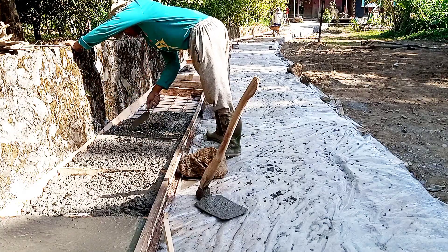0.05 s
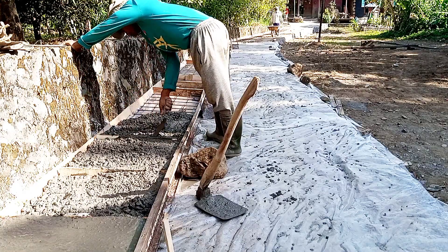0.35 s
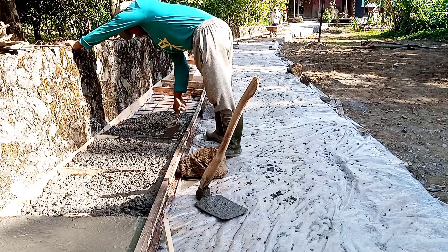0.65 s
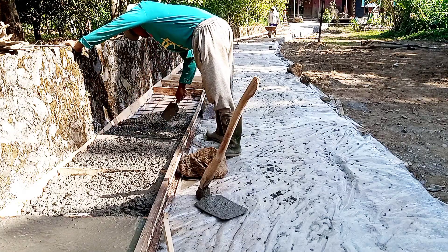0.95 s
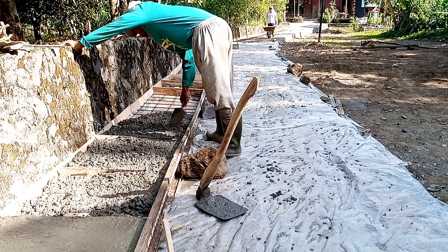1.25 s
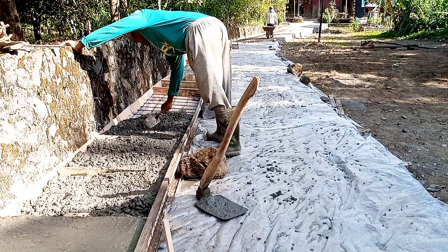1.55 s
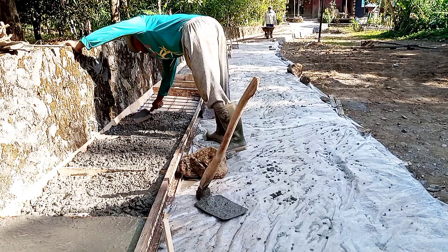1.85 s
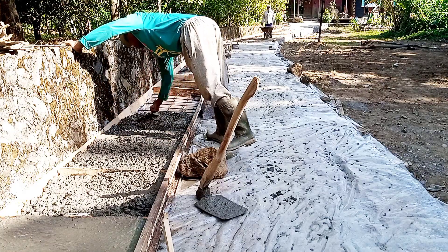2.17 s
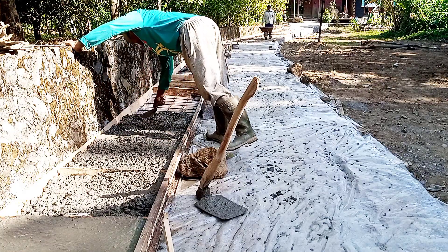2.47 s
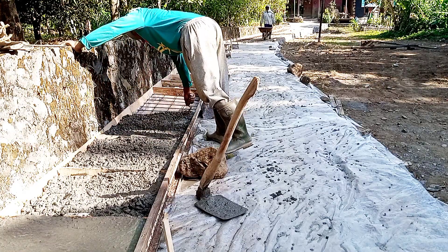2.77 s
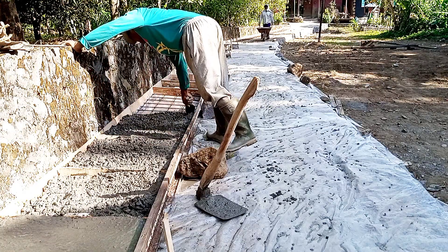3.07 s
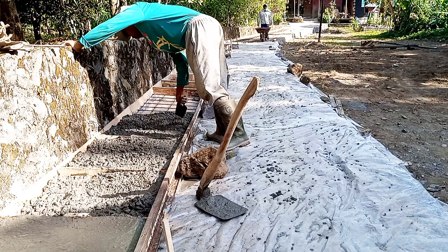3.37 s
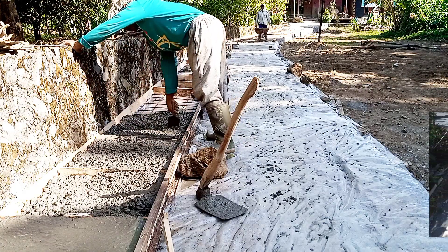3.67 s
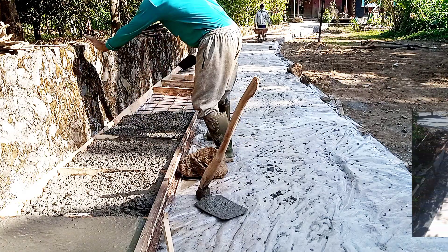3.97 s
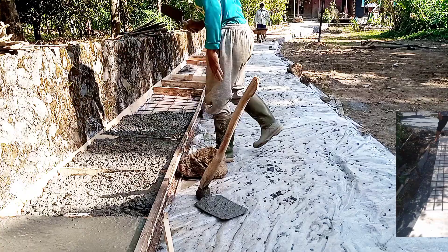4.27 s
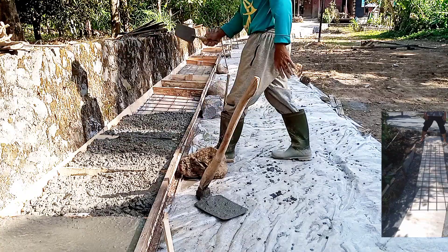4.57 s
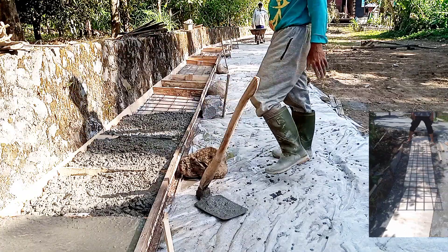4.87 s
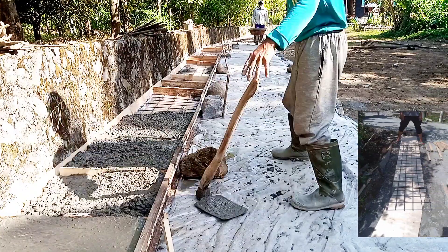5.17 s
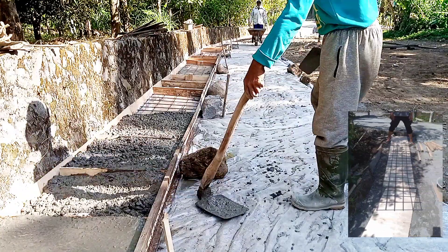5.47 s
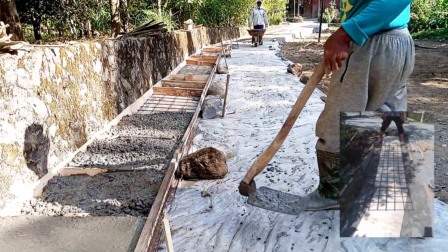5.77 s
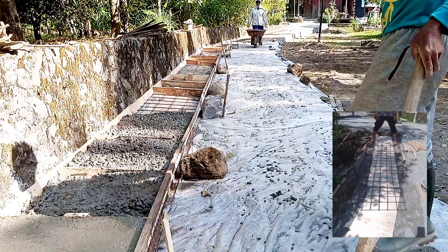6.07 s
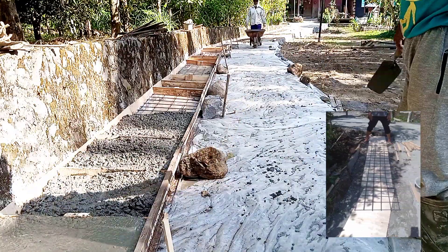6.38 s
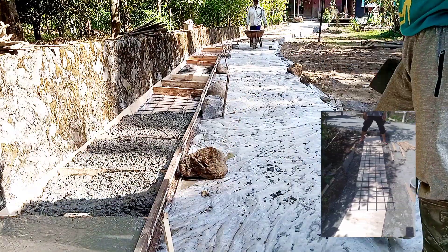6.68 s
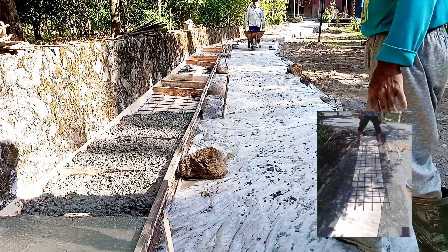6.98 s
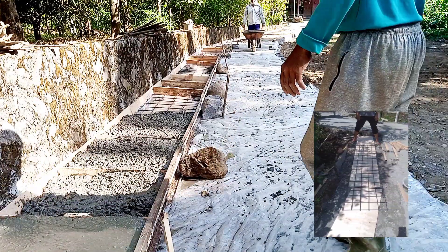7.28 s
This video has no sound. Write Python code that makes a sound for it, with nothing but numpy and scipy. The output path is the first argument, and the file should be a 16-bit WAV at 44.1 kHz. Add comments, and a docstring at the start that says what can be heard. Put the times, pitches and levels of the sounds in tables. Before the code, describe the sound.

Gritty trowel strokes and sharp clinks in wet concrete, followed by soft footsteps on plastic, with a light breeze rumbling.

```python
"""A worker spreads wet, stony concrete with a steel trowel, outdoors beside a wall.
0-3.8 s: the blade drags through the mix, crushing grit and pushing mortar; it knocks on stones,
hardest at 2.3 and 3.1 s, and air pockets plop. Near 3.5 s the light breeze that rumbles on the
microphone throughout gusts most. From 3.9 s his clothes rustle as he stands up; from 4.2 s he
walks off in rubber boots over crackling plastic sheeting, against a faint far hiss."""
import sys
import numpy as np
from scipy import signal
from scipy.fft import rfft, irfft
from scipy.io import wavfile

SR = 44100
rng = np.random.default_rng(int(sys.argv[2]) if len(sys.argv) > 2 else 0)


def generate_wav(signal):
    """Clip the signal to [-1, 1] and save it as 16-bit WAV at the path in sys.argv[1]."""
    frames = np.transpose(np.atleast_2d(signal))
    scaled = np.clip(frames, -1, 1) * 32767
    pcm = np.round(scaled).astype(np.int16)
    wavfile.write(sys.argv[1], SR, pcm)


N = 332073
TIME = np.arange(N) / SR

# blade hits stone: (time [s], level [dB], t60 [s], body re edge [dB], fizz re edge [dB], favoured [Hz])
KNOCKS = [(0.049, -46.5, 0.062, -25, -23, 4500), (0.233, -32.5, 0.054, -17, -19, 3000),
          (0.559, -35, 0.085, -9, -16, 3600), (0.811, -27.5, 0.027, -3, -37, 3500),
          (0.951, -34, 0.039, -5, -35, 4000), (0.975, -31, 0.037, -7, -45, 3600),
          (1.13, -23, .065, -8.5, -18, 4370), (1.329, -44.5, 0.017, -14, -25, 4600),
          (1.468, -45, 0.054, -4, -8.5, 2500), (1.529, -26, 0.007, 0, -40, 2660),
          (2.232, -26.5, 0.054, -28, -15.5, 4070), (2.281, -11.5, 0.043, -18.5, -32, 2830),
          (2.298, -21.5, 0.054, -20.5, -23, 3500), (2.334, -14.5, 0.061, -39, -46, 2800),
          (2.574, -22.5, 0.12, -9, -23, 3470), (3.109, -5, 0.061, -1.5, -51, 3530),
          (3.127, -13.5, 0.045, -4.5, -27, 4400), (3.149, -20, 0.031, 4.5, -37, 2700),
          (3.46, -25, 0.078, -8.5, -19, 4100), (3.506, -17.5, 0.0052, -31, -32, 4150)]
KNOCK_RISE_PER_T60 = .11
# spectra of blade edge, blade body and soft mortar: (frequency [Hz], level [dB])
EDGE_SPECTRUM = [(700, -38), (1300, -15), (1800, -5.5), (2500, 3.5), (4000, 3), (4700, 3), (5300, -3.5),
                 (6800, -12.5), (7800, -31), (9500, -34.5), (12500, -30.5), (15500, -34)]
BODY_SPECTRUM = [(300, -23), (500, -14), (700, -3), (1050, 1.5), (1400, 1), (2000, -13), (3500, -50),
                 (8000, -60)]
MORTAR_SPECTRUM = [(100, -22.5), (200, -1), (290, 4.5), (480, -1), (700, -13.5), (1500, -36.5),
                   (5000, -57.5)]


def scraping(edge_db=1.0, body_db=-2.5, mortar_db=-3.5, stones_db=-12):
    """Grit slips under the blade, wet pockets burst, pebbles tick, mortar is pushed ahead."""
    grit = grains(per_s=8000, spread_db=3.4, clump_db=2.3, clump_per_s=260)
    wet = .4 * pockets(per_s=330, life_s=.03, spread_db=10, low_hz=600, high_hz=4800)
    squelch = pockets(per_s=90, life_s=.06, spread_db=6, low_hz=180, high_hz=620)
    squelch += grains(per_s=1100, spread_db=0.5, clump_db=4.0, clump_per_s=60)
    stones = from_db(stones_db) * grains(per_s=46, spread_db=2.0, clump_db=1.0, clump_per_s=12)
    steel = blade(grit + wet + stones, ring_db=-3, swing_db=5)
    on_edge, on_body, on_mortar, on_fizz = pressure()
    edge = from_db(edge_db) * on_edge * unit_rms(colour(cavities(steel), EDGE_SPECTRUM))
    body = from_db(body_db) * on_body * unit_rms(colour(steel, BODY_SPECTRUM))
    mortar = from_db(mortar_db) * on_mortar * unit_rms(colour(squelch, MORTAR_SPECTRUM))
    return edge + body + mortar + treble_fizz(on_fizz, gain_db=0.5) + furrow()


def pressure(judder_db=0.11, judder_per_s=70):
    """Gains of edge, body, mortar and fizz under uneven drag; pushes add in power."""
    # pushes: (time [s], length [s], edge [dB], fade [dB], body [dB], mortar [dB], fizz [dB])
    # last three re edge
    strokes = [(0.0, 0.074, -62.5, 7.5, 0, -3, -37), (0.309, .14, -54.5, 5, -2.5, -16.5, -17.5),
               (0.597, 0.13, -49.5, 7, -3.5, -20, -25), (0.737, 0.053, -65, -11.5, -2, -25, -24),
               (0.782, 0.075, -45.5, 2, 0, -26, -25), (0.861, 0.13, -43.5, 4.5, 1.5, -24.5, -40),
               (1.15, 0.13, -46, 19, -2.5, -10, -27), (1.29, 0.058, -63, 1.5, -3, -15, -30),
               (1.478, .30, -53, 4.5, -1.5, -16, -26.5), (1.785, .15, -55, -3, -2.5, -5, -44),
               (1.945, 0.14, -57, -5, -10.5, -15, -44), (2.097, 0.13, -68.5, 7.5, 1, 4, -35),
               (2.238, 0.042, -42.5, -2, -20, -22, -22), (2.267, 0.21, -26, 11, -14.5, -31.5, -37),
               (2.373, .055, -41.5, 12, 9.5, 3.5, -40), (2.474, 0.11, -35, -0.5, -12.5, -32, -21.5),
               (2.558, 0.11, -33.5, 1.5, -7, -27, -30), (2.677, 0.098, -45.5, 19.5, -27, -15, -38),
               (2.775, 0.056, -57.5, 1.5, -8, -15, -35), (2.841, 0.071, -60.5, -1.5, -8, -12.5, -30),
               (2.927, 0.18, -67.5, 8, -1.5, -2, -35), (3.115, 0.074, -23, 10.5, -3, -18, -29.5),
               (3.184, 0.11, -30, 4.5, -7.5, -16.5, -32), (3.286, 0.055, -41, 7, -3, -18, -49),
               (3.475, 0.091, -34.5, 9.5, -8, -39, -35), (3.585, 0.12, -62, 5.5, -1, -22, -17),
               (3.666, 0.056, -57.5, -8.5, -1.5, -22, -39), (3.763, 0.064, -70.5, -1, -1, -7, -35.5)]
    pushes = np.array([from_db(db) * push(s, length_s, fade_db)
                       for s, length_s, db, fade_db, *_ in strokes])
    shares = from_db([(0, *row[4:]) for row in strokes])
    return np.sqrt(shares.T ** 2 @ pushes ** 2) * from_db(judder_db * drift(judder_per_s))


def push(start_s, length_s, fade_db, attack_s=0.019, lift_db_per_s=642.5,
         crumbs_db=-22, crumbs_db_per_s=200):
    """Stroke envelope: the edge bites, pressure eases, the blade lifts, crumbs trickle back."""
    t = np.maximum(TIME - start_s, 0)
    after_s = np.maximum(t - length_s, 0)
    bite = np.minimum(t / attack_s, 1) ** 2
    ease = from_db(-fade_db * np.minimum(t / length_s, 1))
    lift = from_db(-lift_db_per_s * after_s)
    crumbs = from_db(crumbs_db - crumbs_db_per_s * after_s)
    return bite * ease * np.maximum(lift, crumbs)


def blade(x, ring_db, swing_db=0, direct=0.89):
    """Direct grit plus ringing steel; swing_db varies the modes as the contact slides."""
    # damped blade modes: (frequency [Hz], width [Hz], level [dB])
    modes = [(717, 17, 5.5), (830.8, 31, 2.5), (1092, 130, -5.5), (1290, 54, 0.5), (1673, 70, -4),
             (1960, 82, 0.5), (2410, 47, -6), (2914, 82, -4.5), (3620, 140, -2), (4100, 140, -3),
             (4590, 100, -3.5)]
    out = direct * x
    for hz, width_hz, db in modes:
        r = np.exp(-np.pi * width_hz / SR)
        b = np.array([1, 0, -1]) * (1 - r * r) / 2
        a = [1, -2 * r * np.cos(2 * np.pi * hz / SR), r * r]
        drive = x * from_db(swing_db * np.clip(drift(22), -2, 2)) if swing_db else x
        out += from_db(db + ring_db) * signal.lfilter(b, a, drive + 1e-18)
    return out


def cavities(x, swing_db=3.5, drift_per_s=20):
    """Gaps between blade and mix open and close, shifting the colour of the scrape."""
    # gap resonances: (frequency [Hz])
    gaps_hz = [1500, 2100, 2800, 3580, 4500]
    out = x
    for hz in gaps_hz:
        band = signal.lfilter(*signal.iirpeak(hz, Q=4, fs=SR), x)
        gain = from_db(swing_db * np.clip(drift(drift_per_s), -2, 2))
        out = out + (gain - 1) * band
    return out


def knocks(gain_db=-11.0, mortar_db=-13.5):
    """Each knock crushes a dense cluster of wet grit and rings the blade."""
    on_edge, on_body, on_fizz = np.zeros((3, N))
    for s, db, t60_s, body_db, fizz_db, _ in KNOCKS:
        peak = from_db(db + gain_db) / np.hypot(1, from_db(body_db))
        force = peak * burst(s, KNOCK_RISE_PER_T60 * t60_s, t60_s)
        on_edge += force
        on_body += force * from_db(body_db)
        on_fizz += force * from_db(fizz_db)
    crush = grains(per_s=16000, spread_db=-1.5, clump_db=1.0, clump_per_s=590)
    edge = colour(blade(crush * on_edge, ring_db=3), EDGE_SPECTRUM)
    thump = blade(crush * on_body, ring_db=2)
    body = colour(thump, BODY_SPECTRUM)
    mortar = from_db(mortar_db) * colour(thump, MORTAR_SPECTRUM)
    return edge + body + mortar + treble_fizz(on_fizz, gain_db=3.5)


def tip_clinks(falloff_db_per_octave=18.5):
    """Knocks ring the tip, most near the pitch the contact point favours, less when buried."""
    # tip modes: (frequency [Hz], level [dB], t60 [s])
    modes = [(2640, -10, 0.038), (3570, -7, 0.039), (3970, -10, .07), (4440, -7.5, 0.051)]
    rings = []
    for s, db, t60_s, body_db, _, favoured_hz in KNOCKS:
        start_s = s + KNOCK_RISE_PER_T60 * t60_s / 2
        buried_db = np.clip(body_db + 9.5, 0, 10)
        for hz, mode_db, mode_t60_s in modes:
            off_pitch_db = falloff_db_per_octave * abs(np.log2(hz / favoured_hz))
            ring_db = db + mode_db - off_pitch_db - buried_db
            rings.append((start_s, hz, ring_db, min(mode_t60_s, 2 * t60_s)))
    return damped_tones(rings, rise_s=.003, waver=.015)


def treble_fizz(force, gain_db, highpass_hz=8000):
    """A faint, thin fizz above 8 kHz follows the scrapes and knocks."""
    clicks = grains(per_s=7000, spread_db=3.5, clump_db=2.5, clump_per_s=160)
    highpass = signal.butter(4, highpass_hz, "high", fs=SR, output="sos")
    return from_db(gain_db) * signal.sosfilt(highpass, force * clicks + 1e-18)


def furrow(width_hz=220):
    """The hollow behind the blade gulps as it closes; its resonance glides."""
    # one list per gulp: (time [s], resonance [Hz], level [dB])
    gulps = [
        [(1.63, 400.4, -79), (1.68, 427.1, -63.5), (1.78, 449, -63.5), (1.83, 554.7, -59), (1.92, 620, -60.5),
         (2.06, 740, -61.5), (2.11, 743.2, -87)],
        [(2.38, 631, -42.5), (2.40, 560, -45.5), (2.44, 493.7, -46.5), (2.48, 480, -58)],
        [(3.116, 764.2, -25.5), (3.16, 688, -32.5), (3.185, 640.7, -45), (3.3, 620, -69.5), (3.37, 570, -66.5)],
    ]
    s, hz, _ = np.concatenate(gulps).T
    return gated_gain(gulps, db_column=2) * resonance(np.interp(TIME, s, hz), width_hz)


def plops():
    """Air pockets and pebbles each sound one short note."""
    # notes: (time [s], pitch [Hz], peak [dB], t60 [s])
    notes = [(1.229, 800, -47.5, 0.06), (1.466, 1930, -40.5, 0.048), (2.388, 620, -37.5, 0.034),
             (2.392, 400, -61, 0.054), (2.418, 280, -39, .08), (2.807, 2320, -43.5, 0.1),
             (2.924, 560, -44, .07), (3.328, 1600, -41.5, 0.038)]
    return damped_tones(notes, rise_s=.009, waver=.05)


def footsteps(crackle_db=-16.0):
    """Soles crinkle wet, gritty plastic; rubber boots knock hollowly; cloth rustles."""
    # landings: (time [s], level [dB], roll of the sole [dB])
    steps = [(4.242, -60, -5.5), (4.579, -55.5, 1), (4.64, -59.5, -7), (5.122, -48, -9.5), (5.42, -64, 8.5),
             (5.739, -47, -6), (5.844, -49, 2), (6.218, -43.5, 3), (6.433, -42, 0), (6.925, -46.5, 2),
             (7.085, -58, 2.5), (7.18, -62, -3), (7.467, -46, -17)]
    # heel, sole, sheet settling: (delay [s], level [dB], rise [s], t60 [s])
    footfall = [(0, 2, 0.006, 0.13), (.02, -13.5, 0.015, 0.21), (.07, -19.5, .03, .4)]
    # boot knocks: (time [s], pitch [Hz], peak [dB], t60 [s])
    thuds = [(6.220, 266, -47, 0.074), (6.250, 390, -43, .05), (6.251, 520, -40, 0.025),
             (6.438, 105, -44.5, 0.11), (6.480, 715, -57.5, 0.15), (6.480, 1380, -56.5, .07)]
    # trousers and sleeves: (time [s], level [dB])
    rustle = [(3.87, -82), (3.91, -73.5), (4.2, -79), (4.32, -87.5), (4.38, -75), (4.62, -78),
              (4.85, -84.5), (5.05, -95)]
    # plastic and cloth: (frequency [Hz], level [dB])
    spectrum = [(150, -34.5), (500, -0.5), (1000, -4), (2500, -0.5), (3600, 1.5), (4400, 1.5), (5400, -9.5),
                (8000, -29.5), (15000, -33.5)]
    weight = np.zeros(N)
    for s, db, roll_db in steps:
        for part, (delay_s, part_db, rise_s, t60_s) in enumerate(footfall):
            peak = from_db(db + part_db + crackle_db + (roll_db if part else 0))
            weight += peak * burst(s + delay_s, rise_s, t60_s)
    crackle = grains(per_s=8000, spread_db=2.6, clump_db=1.6, clump_per_s=200)
    crackle += .4 * pockets(per_s=300, life_s=.03, spread_db=8, low_hz=700, high_hz=4800)
    cloth = gated_gain([rustle], db_column=1) * colour(rng.standard_normal(N), spectrum)
    boots = damped_tones(thuds, rise_s=0.0038, waver=0.061)
    return colour(weight * crackle, spectrum) + boots + cloth


def yard(x, wall_s=.0065, wall_db=-20.5, tail_db=-26.0, t60_s=0.24, lowpass_hz=5000):
    """One wall reflection, then thin scatter from the surroundings."""
    t = TIME[:SR]
    scatter = rng.standard_normal(SR) * from_db(-60 * t / t60_s) * np.minimum(t / .03, 1)
    lowpass = signal.butter(2, lowpass_hz, fs=SR, output="sos")
    echo = from_db(tail_db) * signal.sosfilt(lowpass, scatter / np.linalg.norm(scatter))
    echo[int(wall_s * SR)] += from_db(wall_db)
    return x + signal.oaconvolve(x, echo)[:N]


def breeze(boom_db=-1.0, rumble_db=-8.5, calm_db=-66, swing_db=1.5, calm_hz=84, gust_hz=101):
    """Wind buffets: broad rumble plus one low resonance that rises in gusts."""
    # gusts: (crest [s], half width [s], level [dB])
    gusts = [(0.29, .07, -50), (2.46, .03, -56.5), (3.24, .15, -52.5), (3.47, 0.088, -39),
             (3.68, .075, -39), (4.12, .2, -52.5), (4.44, .05, -56.5), (6.44, .04, -57), (7.43, .09, -57)]
    # rumble: (frequency [Hz], level [dB])
    spectrum = [(20, -40), (45, -29), (65, -9.5), (85, -1), (104, 5), (125, -7.5), (160, -9), (220, -15.5),
                (400, -30.5), (1500, -62.5)]
    gusting = sum(from_db(db) * np.exp(-((TIME - s) / width_s) ** 2) for s, width_s, db in gusts)
    strength = np.hypot(gusting, from_db(calm_db + swing_db * drift(8)))
    boom_hz = np.interp(20 * np.log10(strength), [-62, -46], [calm_hz, gust_hz])
    boom = from_db(boom_db) * resonance(boom_hz, width_hz=24)
    rumble = from_db(rumble_db) * colour(rng.standard_normal(N), spectrum)
    return strength * (boom + rumble)


def far_air(level_db=-69.5, swing_db=0.83):
    """Faint distant rumble and hiss."""
    # background: (frequency [Hz], level [dB])
    spectrum = [(25, -9), (45, -6), (70, 1), (130, 1), (346, -12.5), (500, -15), (760, -20), (1000, -22),
                (1300, -21.5), (2270, -24), (4220, -25.5), (5500, -30), (8170, -41.5), (13500, -42.5),
                (15500, -34)]
    return from_db(level_db + swing_db * drift(2.3)) * colour(rng.standard_normal(N), spectrum)


def far_tones(waver=0.0141):
    """Soft, unsteady distant notes swell and fade."""
    # notes: (time [s], pitch [Hz], peak [dB], length [s])
    notes = [(0.0, 550, -72.5, 0.52), (0.0, 990, -76, 0.25), (0.0, 760, -57, 0.018),
             (4.739, 1370, -79.5, 0.13), (5.331, 780, -71.5, 0.076), (6.142, 770, -73.5, 0.12)]
    out = np.zeros(N)
    warped_s = TIME + waver * np.cumsum(drift(60)) / SR
    for s, hz, db, length_s in notes:
        on = (TIME >= s) & (TIME < s + length_s)
        swell = np.sin(np.pi * (TIME[on] - s) / length_s)
        out[on] += from_db(db) * swell * np.sin(2 * np.pi * hz * warped_s[on])
    return out


def far_band(hz=760, width_hz=120, level_db=-87.5, swing_db=1.5):
    """A narrow band of distant noise swells and fades."""
    return from_db(level_db + swing_db * drift(15)) * resonance(hz, width_hz)


def grains(per_s, spread_db, clump_db, clump_per_s):
    """Random clicks of uneven size, level clumped in time; rms 1."""
    sizes = from_db(spread_db * np.minimum(rng.exponential(1, N), 4)) * rng.choice([-1, 1], N)
    hits = rng.random(N) < per_s / SR
    return unit_rms(sizes * hits * from_db(clump_db * drift(clump_per_s)))


def pockets(per_s, life_s, spread_db, low_hz, high_hz):
    """Tiny wet cavities open at random and ring, each at its own pitch; rms 1."""
    when, pitch, size, phase = rng.random((int(per_s * N / SR), 4)).T[:, :, None]
    t = TIME[:int(life_s * SR)]
    hz = low_hz + (high_hz - low_hz) * pitch
    envelope = np.sqrt(t / life_s) * (1 - t / life_s) ** 2
    rings = np.sin(2 * np.pi * (hz * t + phase)) * envelope * from_db(spread_db * size)
    index = (when * N).astype(int) + np.arange(len(t))
    return unit_rms(np.bincount(index.ravel(), rings.ravel(), N)[:N])


def damped_tones(rows, rise_s, waver):
    """Short decaying sines; waver is the relative rms pitch deviation."""
    out = np.zeros(N)
    warped_s = TIME + waver * np.cumsum(drift(250)) / SR
    for s, hz, db, t60_s in rows:
        envelope = burst(s, rise_s, t60_s)
        on = envelope > 0
        out[on] += from_db(db) * envelope[on] * np.sin(2 * np.pi * hz * warped_s[on])
    return out


def resonance(hz, width_hz):
    """Narrow noise around a steady or moving centre; rms 1."""
    lowpass = signal.butter(2, width_hz / 2, fs=SR, output="sos")
    i, q = signal.sosfilt(lowpass, rng.standard_normal((2, N)))
    phase = 2 * np.pi * np.cumsum(hz * np.ones(N)) / SR
    return unit_rms(i * np.cos(phase) + q * np.sin(phase))


def burst(start_s, rise_s, t60_s):
    """Contact envelope: quadratic rise to 1, exponential fall."""
    out, start = np.zeros(N), min(int(start_s * SR), N)
    t = TIME[:min(N - start, int((rise_s + 2 * t60_s) * SR))]
    fall = from_db(-60 * np.maximum(t - rise_s, 0) / t60_s)
    out[start:start + len(t)] = np.minimum(t / rise_s, 1) ** 2 * fall
    return out


def gated_gain(curves, db_column, fade_s=.006):
    """Gain along dB curves, silent outside them."""
    s, db = np.concatenate(curves)[:, [0, db_column]].T
    gate = np.zeros(N)
    for rows in curves:
        start_s, end_s = rows[0][0], rows[-1][0]
        gate += np.interp(TIME, [start_s - fade_s, start_s, end_s, end_s + 2 * fade_s], [0, 1, 1, 0])
    return np.minimum(gate, 1) * from_db(np.interp(TIME, s, db))


def colour(x, spectrum, taps=4096):
    """Minimum-phase filter to a spectrum; keeps white-noise power."""
    hz, db = np.transpose(spectrum)
    bins_hz = np.fft.rfftfreq(taps, 1 / SR)
    gain = unit_rms(from_db(np.interp(np.log(bins_hz + 1), np.log(hz), db)))
    cepstrum = irfft(np.log(gain))
    cepstrum[1:taps // 2] *= 2
    cepstrum[taps // 2 + 1:] = 0
    return signal.oaconvolve(x, irfft(np.exp(rfft(cepstrum))))[:N]


def drift(per_s):
    """Line through random knots; rms 1."""
    knots = rng.standard_normal(8000)
    return unit_rms(np.interp(TIME * per_s, np.arange(len(knots)), knots))


def from_db(db):
    """Decibels to gain."""
    return 10 ** (np.asarray(db) / 20)


def unit_rms(x):
    """Scale to rms 1."""
    return x / np.sqrt(np.mean(x ** 2) + 1e-20)


def scene():
    """Trowel work and steps in the yard, over breeze and distant background; mono."""
    work = plops() + scraping() + knocks() + tip_clinks() + footsteps()
    return (yard(work) + breeze() + far_air() + far_tones() + far_band())[None]


def record(dry):
    """Steep low-pass on the top treble."""
    cutoff_hz = 15700
    return signal.sosfilt(signal.ellip(10, .1, 70, cutoff_hz, fs=SR, output="sos"), dry)


dry = scene()
out = record(dry)
generate_wav(out)
```